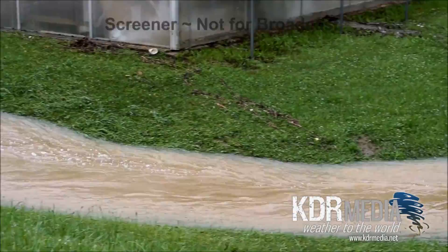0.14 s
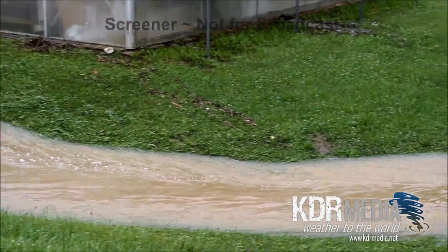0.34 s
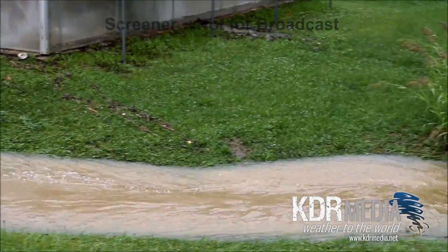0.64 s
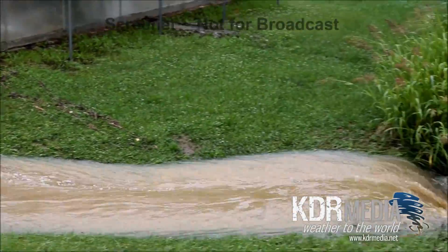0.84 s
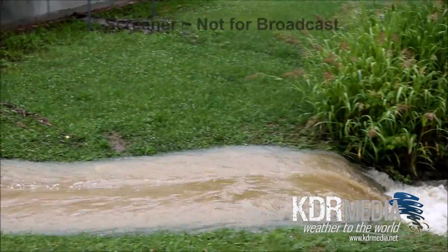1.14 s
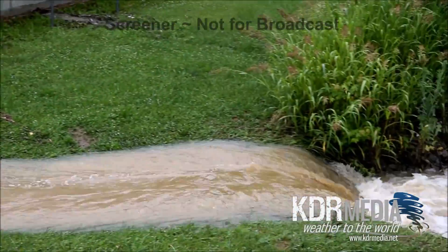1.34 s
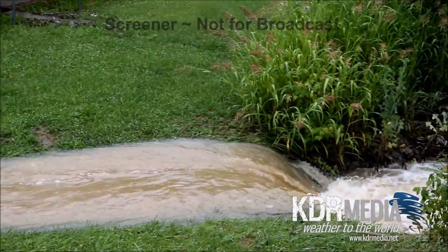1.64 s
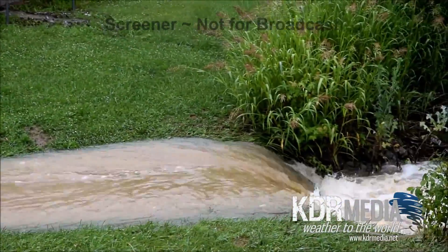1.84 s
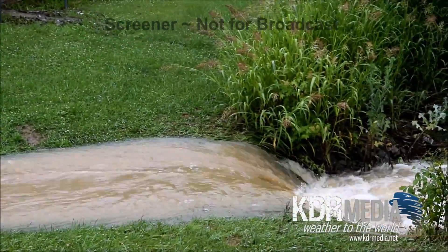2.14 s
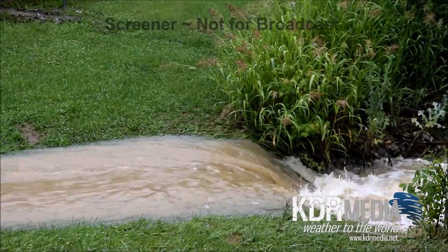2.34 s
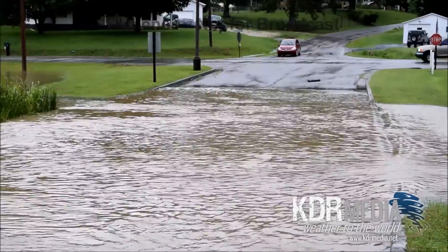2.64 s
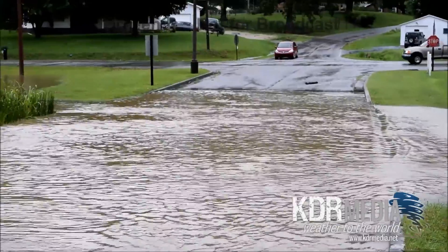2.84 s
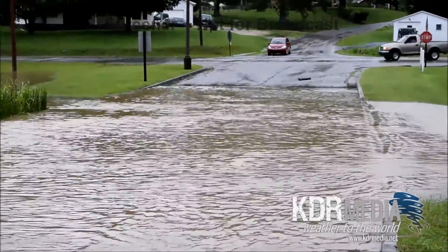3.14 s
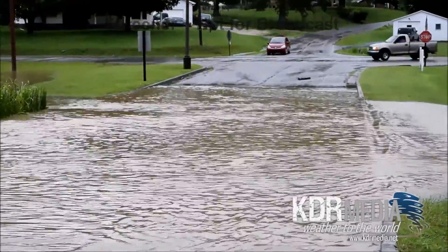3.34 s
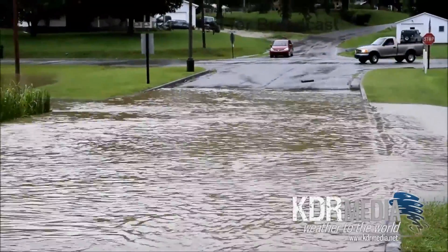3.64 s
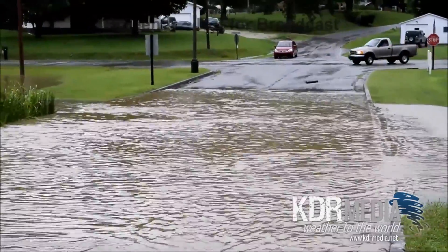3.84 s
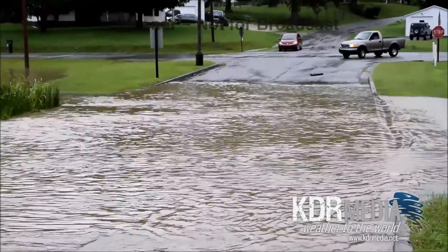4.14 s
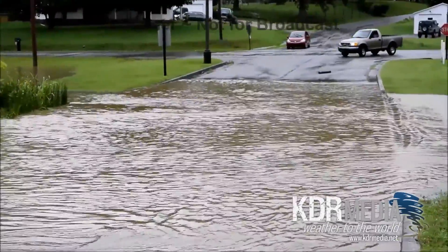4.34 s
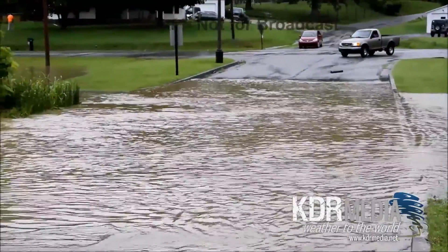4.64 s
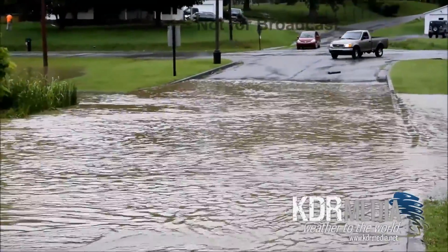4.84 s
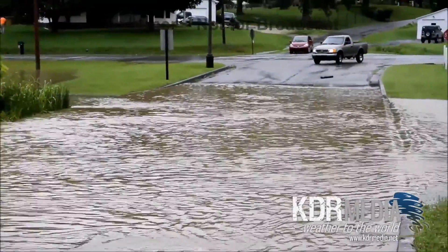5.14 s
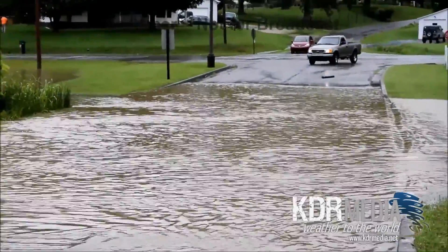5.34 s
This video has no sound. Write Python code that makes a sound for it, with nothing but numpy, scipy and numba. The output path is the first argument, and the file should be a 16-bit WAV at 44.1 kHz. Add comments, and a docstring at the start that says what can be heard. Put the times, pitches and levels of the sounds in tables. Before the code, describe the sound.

Close, full-bodied water plunges over a grassy bank into a ditch, churning and bubbling steadily with splash slowly brightening. It stops instantly. After a quarter second of silence, a duller, wider rush of floodwater over a road fades in quickly and holds, rumble and roar swelling unevenly. Near the end a faint spray hiss bursts and dies away. Outdoors, dry pickup, no echo, top treble missing.

```python
"""Floodwater in two scenes

Water pours steadily over a bank into a foaming ditch: bubbles that ring and climb in pitch, over foam noise.
It stops, and after a short silence a wide, duller sheet of water fades in, rushing across a road.
Late on, a spray-like hiss of shaped noise leaks in, bursts and dies away, with faint whistles in its tail."""
import sys
import numpy as np
from scipy import signal
from scipy.fft import rfft, irfft
from scipy.io import wavfile
from numba import njit

SR = 44100
rng = np.random.default_rng(int(sys.argv[2]) if len(sys.argv) > 2 else 0)


def transcribe(signal):
    """Save signal, clipped to [-1, 1], as a 16-bit WAV file at the path in sys.argv[1]."""
    frames = np.atleast_2d(signal).T
    limited = np.clip(frames, -1, 1)
    pcm = np.round(limited * 32767).astype(np.int16)
    wavfile.write(sys.argv[1], SR, pcm)


N = 242549


def ditch():
    """Water plunges over the bank and beats air into a cloud of ringing bubbles; its splash grows slowly."""
    # Spectrum of the plunging water. Each row: frequency in Hz, relative density in dB per Hz.
    ditch_spectrum = [(22, -28.5), (65, -10), (120, -8), (185, -2), (350, -1.5), (420, -6.3), (510, -12.5),
                      (670, -8), (860, -7), (1100, -12.5), (1650, -13.5), (2050, -16), (2850, -20.5),
                      (3150, -24.5), (3450, -24), (3900, -27), (4950, -28), (5900, -32.5), (10000, -36),
                      (12500, -44), (13800, -44.5), (15500, -53)]
    rumble_db, churn_db = -24, -22
    splash_start_db, splash_rise_db_per_s = -29, 0.71
    cloud = bubbles(cycles=19.5, spread_db=0.13, rise=0.11, count=45000)
    splash_db = splash_start_db + splash_rise_db_per_s * clock()
    return water(ditch_spectrum, rumble_db, churn_db, splash_db, cloud,
                 foam_db=-2.0, blur_hz=3950, splash_top_hz=12000)


def road():
    """A broad, shallow, duller rush: rumble and roar each swell and settle over a steady splash."""
    # Spectrum of the sheet of water. Each row: frequency in Hz, relative density in dB per Hz.
    road_spectrum = [(25, -28), (70, -7), (100, -6.3), (160, -2.4), (215, -0.8), (320, -2), (420, -0.5),
                     (540, -2.5), (700, -7), (950, -9), (1200, -13.5), (1620, -14.5), (1850, -18.5),
                     (2500, -22), (3000, -27), (4300, -33), (5800, -39), (10500, -46), (13000, -56),
                     (15500, -64)]
    # Rumble, below 280 Hz. Each row: time in seconds, level in dB before the fade-in.
    rumble_levels = [(2.95, -28.5), (3.13, -27), (3.3, -28), (3.72, -25), (3.81, -24.2), (3.92, -27),
                     (4.3, -26), (4.58, -28.5), (4.7, -26), (4.87, -27), (5.07, -30.5), (5.2, -23),
                     (5.33, -27.5)]
    # Roar, 280 Hz to 1 kHz. Each row: time in seconds, level in dB before the fade-in.
    roar_levels = [(2.9, -25), (3.05, -24.8), (3.2, -26.5), (3.32, -22), (3.44, -25), (3.88, -24),
                   (4.05, -22.5), (4.24, -24.5), (4.5, -25.5), (4.58, -23), (4.78, -23.5), (4.94, -25),
                   (5.2, -24.5)]
    splash_db = -32.5
    cloud = bubbles(cycles=20.5, spread_db=0.26, rise=0.08, count=45000)
    rumble_db = np.interp(clock(), *np.transpose(rumble_levels))
    roar_db = np.interp(clock(), *np.transpose(roar_levels))
    return water(road_spectrum, rumble_db, roar_db, splash_db, cloud,
                 foam_db=0.0, blur_hz=3000, splash_top_hz=3530)


def water(spectrum, rumble_db, churn_db, splash_db, cloud, foam_db, blur_hz, splash_top_hz):
    """Bubbles blur into foam noise; rumble, churn and splash have their own levels, and octaves flicker."""
    rumble_top_hz, churn_top_hz, splash_low_hz = 280, 1000, 1500
    # unrest at the lowest octave: common to all octaves, and each octave's own
    surge_db, flicker_db = 0.2, 0.35
    surge_per_s, flicker_per_s = 17, 24
    hz = frequencies()

    # power share; above blur_hz bubbles are too many and too small to hear singly
    bubble_share = 1 / (1 + undb(2 * foam_db)) / (1 + (hz / blur_hz) ** 2)
    foam = rng.standard_normal(N)
    mix = rfft(cloud) * np.sqrt(bubble_share) + rfft(foam) * np.sqrt(1 - bubble_share)
    source = mix * colour(spectrum, hz)

    def band_rms(mask):
        """Rms of the source within a frequency mask."""
        return np.std(irfft(source * mask, N))

    rumble_gain = undb(rumble_db) / band_rms(hz < rumble_top_hz)
    churn_gain = undb(churn_db) / band_rms((hz > rumble_top_hz) & (hz < churn_top_hz))
    splash_gain = undb(splash_db) / band_rms((hz > splash_low_hz) & (hz < splash_top_hz))

    octave = np.log2(np.clip(hz, 62.5, 16000) / 62.5)
    surge = walk(surge_per_s)
    out = 0
    for k in range(9):
        band = irfft(source * np.clip(1 - abs(octave - k), 0, 1), N)
        # rumble gives way to churn near 280 Hz, churn to splash from 500 Hz to 2 kHz
        low = np.clip((3 - k) / 1.5, 0, 1)
        high = np.clip((k - 3) / 2, 0, 1)
        gain = low * rumble_gain + (1 - low - high) * churn_gain + high * splash_gain
        # countless small bubbles average out: the treble is steadiest
        unrest = 1 / (1 + (k / 6) ** 4)
        wobble_db = unrest * (surge_db * surge + flicker_db * walk(flicker_per_s))
        out = out + band * gain * undb(wobble_db)
    return out


def bubbles(cycles, spread_db, rise, count):
    """A cloud of bubbles, even in spectrum: many small and high, few large and low, strengths by chance."""
    low_hz, high_hz = 90, 15000
    when, bore, life, luck = rng.random((count, 4)).T
    root_low, root_high = np.sqrt(low_hz), np.sqrt(high_hz)
    hz = (root_low + bore * (root_high - root_low)) ** 2
    length = cycles * (0.5 + life) * SR / hz  # samples
    turn = 2 * np.pi * hz / SR  # radians per sample
    fade = np.log(300) / length  # to 1/300 by the end
    glide = rise * turn / length  # pitch climbs by the fraction rise
    # small bubbles die sooner, so they start stronger to carry the same power
    size = hz ** 0.75 * undb(-spread_db * np.log(np.maximum(luck, 0.01)))
    starts = (when * N).astype(np.int64)
    return unit(ring(starts, turn, fade, glide, size, length.astype(np.int64), N))


@njit
def ring(starts, turn, fade, glide, size, length, out_size):
    """Sum of dying sines whose pitch climbs as they ring, each a rotating, shrinking phasor."""
    out = np.zeros(out_size)
    for k in range(len(starts)):
        z = size[k] + 0j
        pole = np.exp(1j * turn[k] - fade[k])
        bend = np.exp(1j * glide[k])
        for i in range(starts[k], min(starts[k] + length[k], out_size)):
            out[i] += z.imag
            z *= pole
            pole *= bend
    return out


def hiss():
    """Spray-like noise leaks in, bursts out brightly and sputters away, its finest sizzle fading first."""
    # Spectrum of the hiss. Each row: frequency in Hz, relative density in dB per Hz.
    hiss_spectrum = [(1500, -23), (3000, 2), (4700, 1), (6500, 0.5), (9000, -1.5), (11400, -5),
                     (12800, -12), (13700, -14.5), (15500, -27)]
    burst_s, attack_s = 4.44, 0.002
    leak_db, leak_rise_db_per_s = -42, 135
    burst_db, burst_fall_db_per_s = -42, 96
    tail_db, tail_fall_db_per_s = -35, 18.5
    sputter_db, sputter_per_s = 0.6, 24
    # sizzle lies above sizzle_hz: boosted in the burst, falling faster in the tail
    sizzle_hz, sizzle_boost_db, sizzle_extra_fall_db_per_s = 11000, 6, 9
    hz = frequencies()

    noise = unit(irfft(rfft(rng.standard_normal(N)) * colour(hiss_spectrum, hz), N))
    sizzle = irfft(rfft(noise) * (1 - 1 / (1 + (hz / sizzle_hz) ** 8)), N)
    body = noise - sizzle

    ahead = np.maximum(burst_s - clock(), 0)
    age = np.maximum(clock() - burst_s, 0)
    opened = np.minimum(age / attack_s, 1)
    leak = undb(leak_db - leak_rise_db_per_s * ahead) * noise
    bright = body + sizzle * undb(sizzle_boost_db)
    burst = undb(burst_db - burst_fall_db_per_s * age) * bright
    dulling = body + sizzle * undb(-sizzle_extra_fall_db_per_s * age)
    tail = undb(tail_db - tail_fall_db_per_s * age + sputter_db * walk(sputter_per_s)) * dulling
    return (1 - opened) * leak + opened * (burst + tail + whistles())


def whistles():
    """Narrow noise bands ring faintly through the dying hiss: they swell once, wavering, and are gone."""
    # Faint whistles. Each row: centre in Hz, relative level in dB.
    whistle_bands = [(8640, 2), (9450, -2), (10400, -8)]
    width_hz, level_db = 150, -50.5  # level at the peak of the swell
    peak_s, swell_s = 4.94, 0.12
    waver_db, waver_per_s = 1.5, 12
    hz = frequencies()
    out = 0
    for centre_hz, db in whistle_bands:
        resonance = 1 / (1 + (2 * (hz - centre_hz) / width_hz) ** 2)
        band = irfft(rfft(rng.standard_normal(N)) * resonance, N)
        out = out + band * undb(db + waver_db * walk(waver_per_s))
    swell = np.exp(-0.5 * ((clock() - peak_s) / swell_s) ** 2)
    return unit(out) * undb(level_db) * swell


def undb(db):
    """Decibels to gain."""
    return 10 ** (np.asarray(db) / 20)


def unit(x):
    """Scale to rms 1."""
    return x / np.sqrt(np.mean(x ** 2))


def clock():
    """Time of every sample in seconds."""
    return np.arange(N) / SR


def frequencies():
    """Frequency of every FFT bin in Hz."""
    return np.fft.rfftfreq(N, 1 / SR)


def colour(points, hz):
    """Gain of a (Hz, dB) spectrum at the given frequencies; zero below its first point."""
    f, db = np.transpose(points)
    return undb(np.interp(np.log(hz + 1), np.log(f), db, left=-np.inf))


def walk(rate_hz):
    """Smooth random signal of rms 1: noise low-passed near rate_hz."""
    return unit(irfft(rfft(rng.standard_normal(N)) / (1 + (frequencies() / rate_hz) ** 4), N))


def scene():
    """The ditch stops within milliseconds; after a silence road and hiss come in along an S-curve of gain."""
    stop_s, stop_db_per_s = 2.229, 3503
    entry_s = 2.496
    fade_floor_db, fade_mid_s, fade_time_s = -29.7, 2.824, 0.049
    t = clock()
    stop = undb(-stop_db_per_s * np.maximum(t - stop_s, 0))
    floor = undb(fade_floor_db)
    fade = floor + (1 - floor) / (1 + np.exp((fade_mid_s - t) / fade_time_s))
    first = ditch() * stop
    second = (road() + hiss()) * fade * (t > entry_s)
    return (first + second)[None]


def record(dry):
    """A steep elliptic low-pass removes the top of the treble."""
    top_hz = 15700
    top_cut = signal.ellip(10, 0.1, 80, top_hz, fs=SR, output="sos")
    return signal.sosfilt(top_cut, dry)


dry = scene()
out = record(dry)
transcribe(out)
```